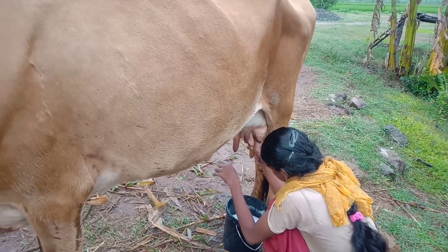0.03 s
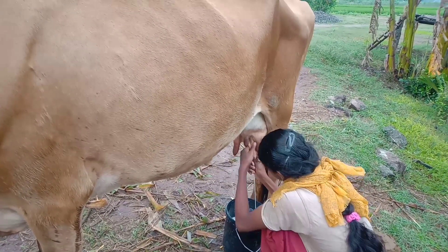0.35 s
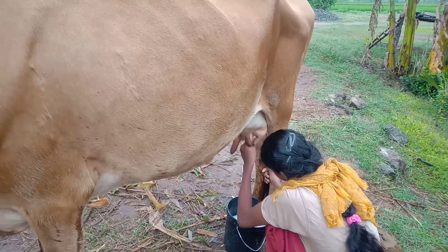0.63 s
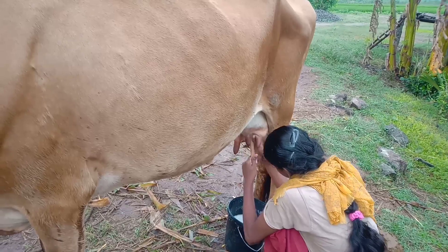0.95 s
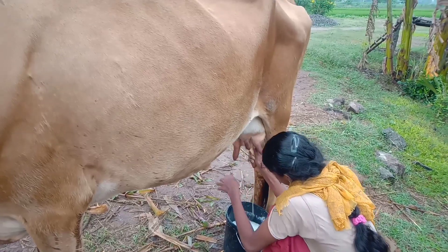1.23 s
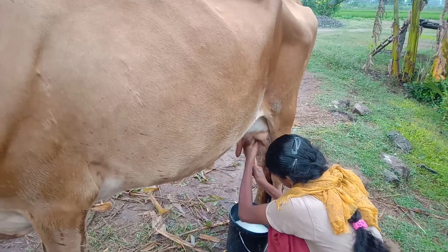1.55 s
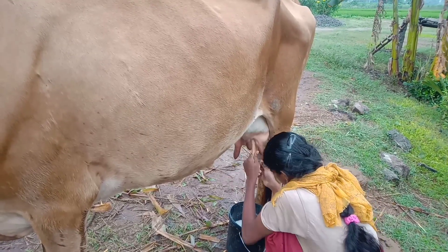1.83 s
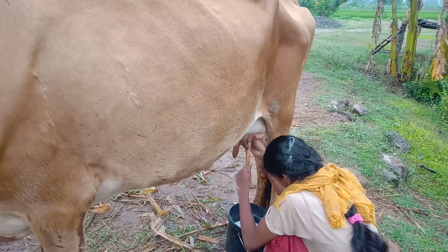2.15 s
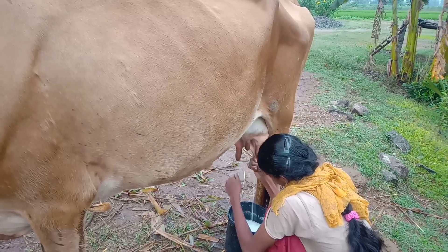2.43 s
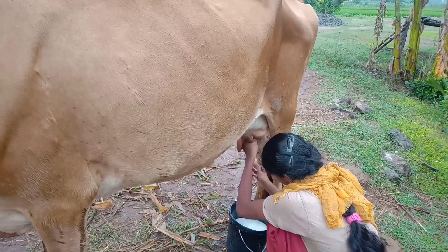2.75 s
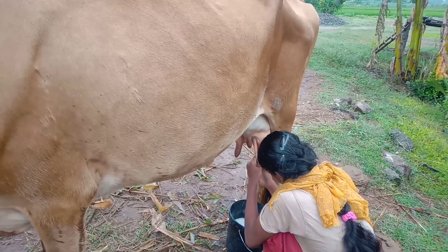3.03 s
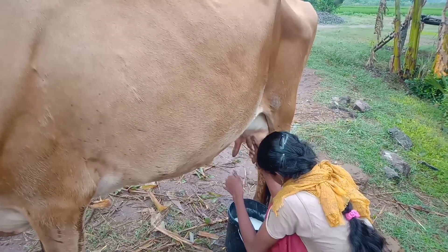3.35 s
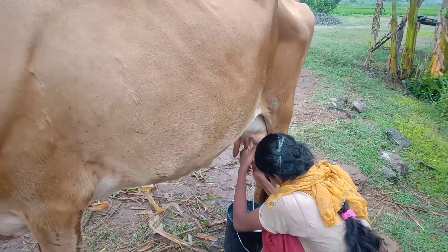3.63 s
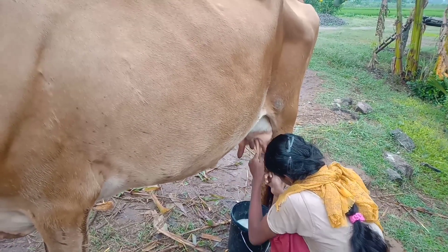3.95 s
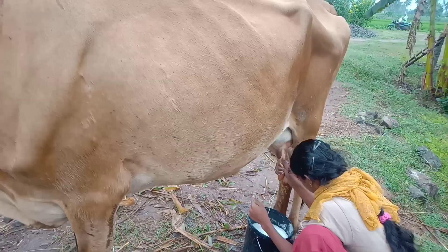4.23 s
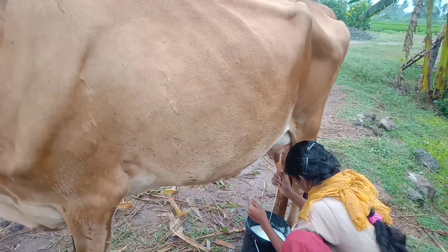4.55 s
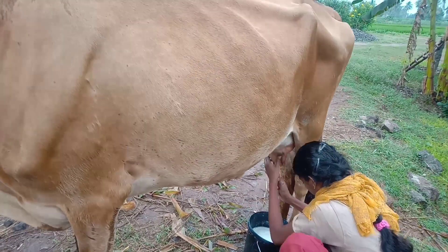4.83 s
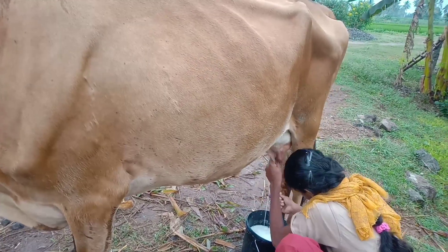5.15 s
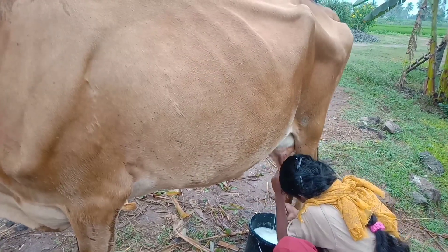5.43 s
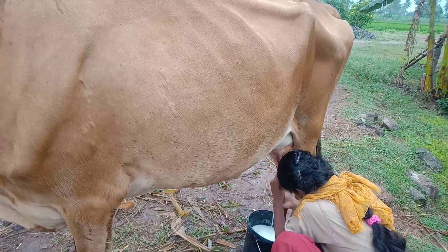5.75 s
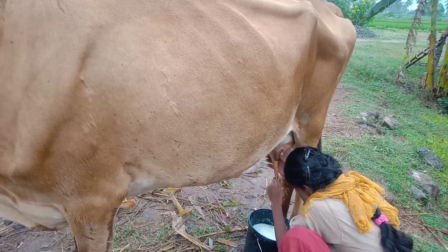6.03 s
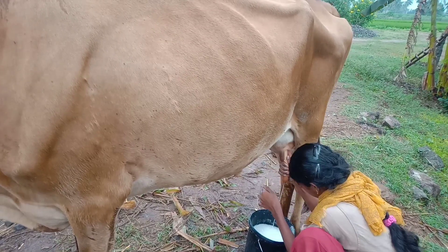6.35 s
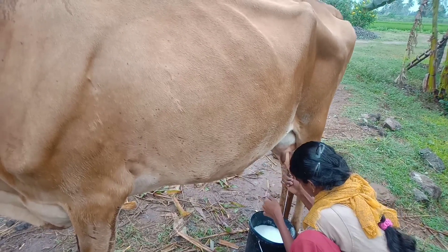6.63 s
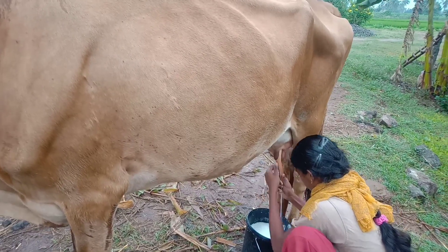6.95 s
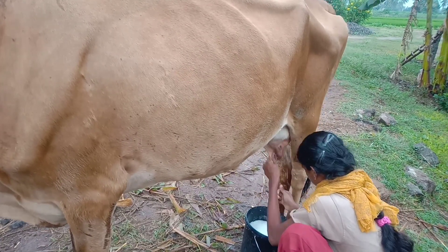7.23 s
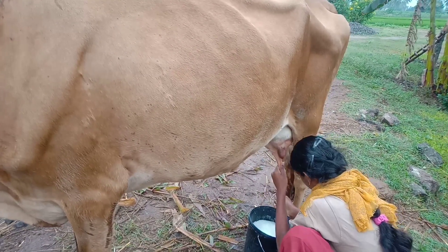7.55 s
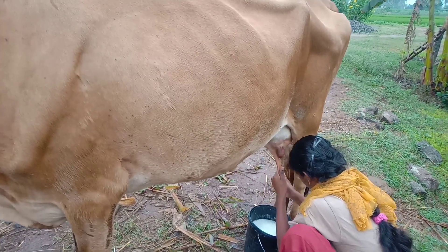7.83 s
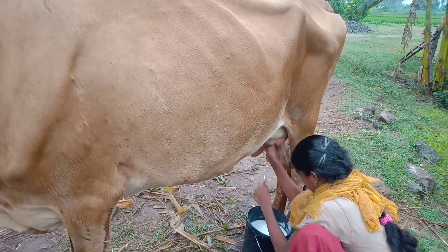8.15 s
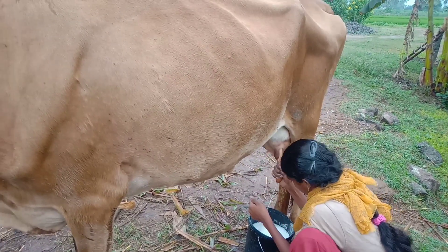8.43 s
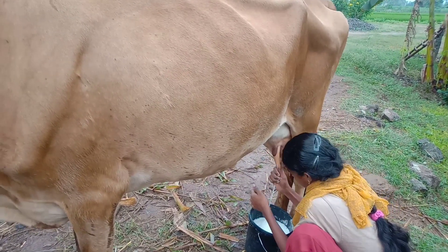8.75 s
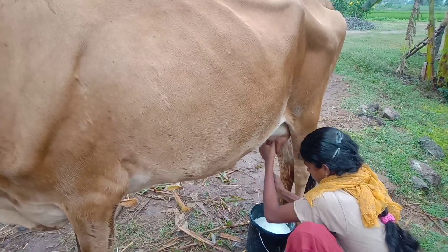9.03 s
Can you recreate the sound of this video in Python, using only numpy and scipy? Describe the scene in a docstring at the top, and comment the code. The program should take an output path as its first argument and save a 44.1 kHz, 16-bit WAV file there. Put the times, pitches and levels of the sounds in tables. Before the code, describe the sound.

A cow is milked by hand outdoors. Jets of milk squirt about twice a second into a partly filled bucket, splattering, fizzing in the froth and bubbling with a hollow ring. A small bird peeps now and then, and in the second half chatters in quick falling chirps. Straw snaps lightly, cloth rustles, and the hand-held microphone bumps softly midway. A steady high hiss lies underneath.

```python
"""Milking a cow by hand

Outdoors, jets of milk bore into the froth in a bucket. They splatter, make the froth fizz, and drag
air under the surface, which bubbles up and rings the bucket's hollow. A small bird peeps, then chatters
in falling chirps. Straw snaps, cloth rustles, and the hand-held microphone bumps and creaks softly.
A steady high hiss lies under everything, and left and right sound almost the same."""
import sys
import numpy as np
from scipy import signal
from scipy.fft import rfft, irfft, next_fast_len
from scipy.io import wavfile
from scipy.ndimage import uniform_filter1d, map_coordinates

SR = 44100
rng = np.random.default_rng(int(sys.argv[2]) if len(sys.argv) > 2 else 0)


def waveform_to_disk(signal):
    """Save audio, clipped to [-1, 1], as 16-bit WAV at the path in sys.argv[1]."""
    frames = np.transpose(np.atleast_2d(signal))
    scaled = np.clip(frames, -1, 1) * 32767
    samples = np.round(scaled).astype(np.int16)
    wavfile.write(sys.argv[1], SR, samples)


N = 410130

# Tone colours, which say how strong each frequency is: (frequency [Hz], gain [dB])
AIR_TONE = [(25, -32.5), (60, -15.5), (100, -8), (170, -13.5), (250, -19.5), (350, -19.5), (520, -22),
            (750, -25), (1050, -26), (1230, -10), (1500, -7), (3000, -3), (3900, -13), (4600, -11),
            (6000, -43)]  # the open air
HISS_TONE = [(3800, -49.5), (4600, -8), (5100, 2), (6000, -1), (6700, 1), (7500, 6.5), (8150, 3.5),
             (8800, -9.5), (10100, -20.5), (12500, -25.5), (15200, -36.5)]  # the steady high hiss
HOUSING_TONE = [(25, -23.5), (60, -10), (90, 0.5), (115, 4), (160, -2), (260, -10.5), (500, -58.5)]  # the microphone's housing
SPLATTER_TONE = [(450, -23.5), (620, -12), (740, -10), (850, -1), (950, -2), (1060, 1.5), (1170, 2),
                 (1280, 1), (1480, -9), (2200, -34.5)]  # the higher ringing of the air in the bucket
HOLLOW_TONE = [(70, -42), (150, -8), (230, -8.5), (310, -0.5), (370, 4.5), (410, 4.5), (455, 1.5),
               (520, -10.5), (620, -11.5), (800, -41)]  # its lowest ringing
FIZZ_TONE = [(850, -53.5), (1130, -18), (1360, -5.5), (2000, 0), (3100, 1), (4300, -4), (5500, 3.5),
             (7000, 2), (8200, -10.5), (8900, -18), (11000, -21.5), (15000, -35.5)]  # bursting froth
VERY_HIGH_TONE = [(5000, -31.5), (8000, -5), (10200, 4), (12500, -3.5), (15300, -13)]  # fine spray, and rustling cloth too
RASP_TONE = [(500, -37.5), (900, -9), (2000, -25), (3200, 4.5), (4500, -5), (5900, 8.5), (7000, 3.5),
             (8500, -11), (13000, -28)]  # the bird's rasp
THROAT_TONE = [(1300, -26), (1750, -20), (2150, -10), (2700, -7), (3400, 0.5), (3850, -6.5), (4300, 0),
               (4800, -3), (5350, 7.5), (6300, -2), (7000, 4.5), (8200, -23), (10000, -30)]  # the bird's throat

# Levels below compare the rows of a table; the functions may turn a whole layer up or down.
# Rumble of the hand on the microphone: (time [s], level [dB])
GRIP_RUMBLE = [(0.0, -89), (1.47, -91), (2.7, -84), (3.52, -90), (4.17, -87), (4.5, -68.5), (6.24, -74),
               (6.55, -79), (7.8, -84), (8.3, -76), (9.3, -81.5)]
# Bumps on the microphone: (time [s], peak level [dB])
GRIP_BUMPS = [(4.231, -54), (4.309, -63), (4.36, -50), (4.649, -61), (4.696, -51), (4.728, -51),
              (4.848, -54), (4.939, -58.5), (5.145, -50.5), (5.178, -52), (5.284, -51.5), (5.349, -54),
              (5.387, -50), (5.94, -51), (8.191, -61.5)]
# Jets plunging into the milk:
# (time [s], length [s], time to the hardest squeeze [s], bubbling level [dB], splatter level [dB])
MILK_JETS = [(0.157, 0.21, 0.037, -61.5, -60.5), (0.356, 0.13, 0.085, -59, -64.5),
             (0.673, 0.19, 0.026, -60, -55.5), (0.843, 0.16, 0.046, -62, -59.5),
             (1, 0.078, 0.057, -64.5, -73), (1.295, 0.094, 0.037, -68.5, -63.5),
             (1.44, 0.058, 0.013, -65, -66.5), (1.516, 0.086, 0.031, -70, -64),
             (1.742, 0.047, 0.028, -77.5, -61), (1.785, 0.1, 0.04, -61.5, -62.5),
             (1.9, 0.2, 0.06, -64, -62.5), (2.044, 0.13, 0.072, -67.5, -63),
             (2.209, 0.047, 0.016, -99, -60.5), (2.368, 0.22, 0.15, -62, -64), (2.528, .19, 0.09, -60, -58),
             (2.922, 0.032, 0.014, -60, -57.5), (2.977, 0.21, 0.037, -59, -56.5),
             (3.423, 0.043, 0.021, -61.5, -62), (3.479, 0.22, 0.13, -60, -59),
             (3.721, 0.038, 0.02, -66, -66), (3.963, 0.2, 0.14, -61.5, -60),
             (4.196, 0.073, 0.046, -62, -59.5), (4.279, 0.4, 0.098, -76.5, -61.5),
             (4.539, 0.44, 0.31, -83, -62), (5.13, 0.45, 0.14, -77, -61), (5.581, 0.14, 0.044, -70, -60.5),
             (5.723, 0.18, 0.075, -76.5, -64), (5.918, 0.073, 0.019, -61, -60.5),
             (6.017, 0.068, 0.021, -69, -64.5), (6.325, 0.17, 0.06, -67, -64),
             (6.51, 0.098, 0.04, -67.5, -65), (6.656, 0.12, 0.036, -76.5, -70),
             (6.809, 0.29, 0.18, -79, -65), (7.28, 0.11, 0.03, -66, -59.5),
             (7.389, 0.33, 0.072, -77.5, -59.5), (7.69, 0.99, 0.17, -82.5, -67), (8.34, .16, .1, -64, -63),
             (8.543, 0.123, 0.06, -68, -65.5), (8.664, 0.22, 0.13, -66, -65.5),
             (8.887, 0.17, 0.14, -73.5, -62.5), (9.249, 0.097, 0.044, -74, -63.5)]
# Jets raking the froth: (time [s], length [s], fizz level [dB], spray level [dB])
FROTH_JETS = [(0.094, 0.06, -54, -72), (0.17, 0.17, -56.5, -65), (0.512, 0.17, -60, -72.5),
              (0.629, 0.099, -54, -67), (0.698, 0.11, -50, -63), (0.808, 0.064, -55.5, -62),
              (0.89, 0.28, -62.5, -70), (1.183, 0.17, -52.5, -68.5), (1.56, 0.27, -55, -66.5),
              (1.829, 0.19, -62, -62), (2.013, 0.29, -55.5, -63.5), (2.359, 0.17, -58.5, -60.5),
              (2.538, 0.21, -51, -60.5), (2.74, 0.084, -57, -65.5), (2.909, 0.088, -56.5, -65.5),
              (3.006, 0.25, -52.5, -64.5), (3.274, 0.17, -62, -73), (3.466, 0.16, -52, -58),
              (3.631, 0.11, -55.5, -63), (3.861, 0.16, -58, -64.5), (3.991, 0.25, -52.5, -61.5),
              (4.3, 0.2, -61, -74), (4.438, 0.683, -61, -66), (5.119, 0.45, -61.5, -72),
              (5.589, 0.46, -64, -77), (5.924, 0.07, -54.5, -61), (6.021, 0.79, -58, -70),
              (6.852, 0.4, -56.5, -66), (7.294, 0.24, -51.5, -59.5), (7.519, 0.86, -55.5, -63),
              (8.344, 0.57, -55.5, -65), (8.88, 0.42, -58.5, -67.5)]
# How each part of a jet's sound swells and fades:
# (head start [s], rise time [s], drop away from the crest [dB per jet length], time to fade 60 dB [s])
SPLATTER_SWELL = (0.022, 0.034, 9, 0.19)
FIZZ_SWELL = (0.029, 0.043, 4.9, 0.18)
SPRAY_SWELL = (0.0056, 0.01, 5.7, 0.17)
BUBBLING_SWELL = (0.0011, 0.013, 7.9, 0.07)
# The hollow's note as the jet digs a pit in the milk: (time [s], pitch [Hz])
PIT_NOTE = [(.17, 335.4), (.42, 364.8), (.49, 302), (.7, 338.6), (.82, 386), (.93, 418), (1.0, 401),
            (1.07, 291.5), (1.32, 371), (1.5, 352), (1.8, 379), (1.92, 409), (2.0, 366.4), (2.08, 265.6),
            (2.16, 368), (2.38, 371.8), (2.55, 399.5), (2.7, 362.6), (2.95, 389.2), (3.15, 432),
            (3.45, 371.3), (3.6, 412), (3.73, 355.7), (4.0, 428), (4.09, 431.6), (4.15, 341), (4.22, 429.4),
            (5.65, 409.6), (5.95, 371), (6.05, 481), (6.36, 350.3), (6.55, 377.6), (8.4, 420.5),
            (8.47, 388), (8.62, 430.7), (8.72, 420), (8.82, 332.6), (8.95, 498)]
# Big drops in the milk: (time [s], level [dB], pitch [Hz], ring time [cycles])
BIG_DROPS = [(0.172, -39, 1300, 4.3), (0.394, -50, 323, 3.5), (0.465, -50, 254, 4.2),
             (0.694, -27, 863, 3.5), (0.846, -40, 1820, 18), (1.049, -52, 234, 3.6),
             (1.198, -37.5, 1370, 15), (1.825, -46.5, 370, 3.9), (2.03, -41.5, 262, 4.2),
             (2.099, -48, 231.5, 5.4), (2.634, -34, 950, 4.6), (2.637, -43, 420, 4.7),
             (2.934, -37.5, 850, 5.5), (3.532, -36, 1330, 9), (5.931, -41.5, 1002, 6), (5.944, -57, 190, 4),
             (7.281, -34, 1113, 6.7), (3.64, -50.5, 261.6, 4.6), (8.195, -58, 340, 3.7),
             (8.463, -49.5, 854, 8.2), (8.466, -49, 321, 4.2)]
# Clumps of bubbles: (time [s], length [s], pitch [Hz], width [octaves], level [dB])
BUBBLE_CLUMPS = [(0.253, 0.068, 990, 0.3, -60), (0.31, 0.04, 660, 0.28, -68),
                 (0.682, 0.035, 721, 0.95, -55), (0.719, .05, 800, 0.65, -59),
                 (1.303, 0.051, 780, 0.2, -64), (1.532, 0.033, 965, 0.27, -60.5),
                 (2.561, 0.022, 898, .4, -55), (2.629, 0.019, 1020, 0.66, -51.5),
                 (2.932, 0.032, 608, 1, -65), (2.986, 0.089, 722, 0.31, -66),
                 (3.186, 0.036, 605, 0.92, -69), (3.487, 0.1, 1226, 0.33, -56.5),
                 (5.208, 0.047, 858, 0.22, -64), (5.931, 0.029, 700, 0.98, -65),
                 (6.35, 0.099, 846, .2, -70), (6.874, 0.052, 918, 0.2, -66.5),
                 (7.437, 0.041, 754, 0.37, -63), (7.504, 0.065, 720, 0.28, -63),
                 (8.356, 0.041, 862, 0.22, -63), (8.438, 0.052, 860, 0.19, -59.5),
                 (8.521, 0.053, 803, 0.26, -62.5), (8.658, 0.042, 861, 0.32, -62),
                 (8.703, 0.056, 772, 0.26, -63.5), (8.763, 0.049, 906, 0.2, -62),
                 (8.994, 0.073, 854, 0.37, -69.5)]
# Gurgles of trapped air: (time [s], length [s], start pitch [Hz], end pitch [Hz], level [dB])
AIR_POCKETS = [(.83, 0.11, 401.5, 441, -62.5), (2.052, 0.084, 246, 233.5, -65),
               (5.94, 0.064, 670, 633, -62.5), (5.815, 0.044, 350, 376, -69.5),
               (6.04, 0.034, 470, 490, -68.5), (7.322, 0.14, 1260, 1250, -59), (8.92, 0.15, 517, 509, -69)]
# Short bird notes: (time [s], length [s], start pitch [Hz], end pitch [Hz], level [dB])
BIRD_PEEPS = [(1.007, 0.056, 4730, 5500, -55), (2.069, 0.024, 5510, 5500, -46),
              (4.29, 0.0333, 6940, 7090, -51), (5.324, 0.033, 7090, 6860, -48),
              (5.421, 0.054, 3350, 3910, -54), (5.419, 0.067, 6920, 6730, -51),
              (5.534, .025, 7270, 7000, -48), (5.556, 0.019, 5900, 5650, -51.5),
              (5.64, 0.045, 6900, 6040, -56), (5.737, 0.052, 3295, 3230, -63),
              (5.854, 0.032, 3135, 2950, -47), (5.957, 0.022, 3440, 3340, -56),
              (7.198, 0.029, 3055, 2754, -56), (7.2, 0.025, 6200, 5480, -50),
              (7.315, 0.04, 3240, 2970, -46.5), (7.319, 0.03, 6350, 6030, -40),
              (7.374, 0.091, 1980, 1860, -55), (7.585, 0.016, 2940, 4100, -54.5),
              (7.725, 0.016, 2930, 4230, -50), (7.723, 0.02, 4480, 6480, -44.5),
              (8.826, 0.024, 5580, 5500, -49.5)]
# Straw snapping underfoot: (time [s], level [dB], pitch [Hz])
STRAW_SNAPS = [(2.8409, -35.5, 5540), (3.6693, -35.5, 5500), (4.232, -38, 7000), (5.8876, -37, 1910),
               (8.253, -37, 5500), (8.301, -40, 5940)]
# Light, hollow knocks of the creaking grip: (time [s], level [dB], pitch [Hz])
HOLLOW_KNOCKS = [(4.312, -56, 646), (4.385, -55, 617), (4.456, -54.5, 641), (4.52, -50, 597),
                 (4.584, -54, 583), (4.728, -59, 597)]
# Falling chirps: (time of the crest [s], length [s], top pitch [Hz], fall [octaves],
# bend [1 = straight, more = a late drop], level [dB], upper overtones [dB], rasp [dB], hoarseness [0-1])
BIRD_CHIRPS = [(5.552, .03, 2384, 0.35, 1.4, -63.5, -10.5, 8.5, .9),
               (5.629, 0.044, 1867, 0.29, 0.81, -54.5, -11, -11, 0.83),
               (5.765, 0.034, 2340, 0.17, 1.4, -61, -5, 6, 0.8),
               (5.871, 0.033, 2290, 0.32, 3, -51.5, -14, -3, .15),
               (5.982, .04, 2315, 0.27, 1.8, -53, -2, -11, .45),
               (6.09, 0.033, 2250, 0.17, 1.6, -59, -4.5, 5, .9),
               (6.203, 0.047, 2227, 0.1, 2, -59, -12.5, -1, 0.77),
               (6.327, 0.036, 2260, .12, 1.06, -56.5, -7, 1, 0.92),
               (6.461, 0.032, 2165, 0.17, 1.2, -54.5, -7.5, 1.5, .9),
               (6.581, 0.047, 2165, 0.13, 1.1, -57, -9, 4, 0.46),
               (6.718, .028, 2215, 0.32, 1.33, -55, -1, 3, 0.54),
               (6.834, .022, 2228, 0.088, 1.25, -55.5, -8, 2, .6),
               (6.978, 0.023, 2150, 0.22, 1.3, -56, -2, 2, 0.77),
               (7.09, 0.028, 2147, 0.078, 1.2, -53.5, -11, 2, 0.32),
               (7.221, 0.034, 2174, 0.23, 1.64, -52.5, -1, -2, 0.32),
               (7.342, 0.045, 2154, 0.62, 2.6, -44.5, -8, -9, .08),
               (7.471, 0.042, 2310, 0.37, 0.87, -48, -3.5, -12, .1),
               (7.605, 0.038, 2150, 0.35, 1.1, -52, 0.5, -9, .12),
               (7.74, 0.04, 2266, 0.48, 1.2, -48, -6, -6, 0.1),
               (7.876, 0.042, 2290, 0.41, 1.5, -52.5, -9.5, -7, 0.53),
               (8.038, .03, 2260, .2, 1.2, -58.5, -9.5, -1.5, 0.93),
               (8.192, 0.033, 2263, 0.18, 1.2, -57.5, -10, 2, .9),
               (8.645, 0.05, 2406, 0.26, 2.2, -54.5, -12, -4, 0.68),
               (8.785, 0.047, 2360, 0.21, 2.2, -53, -12, -2, .7)]
# Harsh bird calls: (time [s], length [s], level [dB])
BIRD_RASPS = [(5.916, 0.082, -46.5), (7.372, 0.14, -55), (7.436, 0.039, -48)]
# Ticks of rustling cloth: (time [s], level [dB])
RUSTLE_TICKS = [(6.4697, -50.5), (7.0944, -48), (7.6644, -49), (8.1943, -43.5), (8.2871, -47),
                (8.7244, -42.5), (9.2534, -45)]


def amp(db):
    """Turn decibels into a number to multiply by."""
    return 10 ** (np.asarray(db) / 20)


def unit(x):
    """Scale x to an average strength (rms) of 1."""
    return x / np.sqrt(np.mean(x ** 2) + 1e-20)


def curve(rows):
    """Join (time, value) points with straight lines, one value per sample."""
    return np.interp(np.arange(N) / SR, *np.transpose(rows))


def wobble(rate):
    """A smooth random curve through `rate` new values a second."""
    return map_coordinates(rng.standard_normal(int(N * rate / SR) + 4), [np.arange(N) * rate / SR])


def colour(x, points):
    """Filter x with a tone colour of (Hz, dB) points; the result has strength 1."""
    size = 2 * next_fast_len(len(x) // 2 + 4096)
    hz, db = np.transpose(points)
    gain = amp(np.interp(np.log(np.fft.rfftfreq(size, 1 / SR) + 1), np.log(hz), db))
    cepstrum = irfft(np.log(gain))
    cepstrum[1:size // 2] *= 2  # folded so the filter rings only after a sound, never before
    cepstrum[size // 2 + 1:] = 0
    return unit(irfft(rfft(x, size) * np.exp(rfft(cepstrum)))[:len(x)])


def noise(points):
    """Noise with the given tone colour."""
    return colour(rng.standard_normal(N), points)


def add(track, s, sound):
    """Mix a sound into the track at s seconds."""
    i = max(round(s * SR), 0)
    track[i:i + len(sound)] += sound[:max(N - i, 0)]


def arch(length):
    """A smooth swell and fade."""
    return np.sin(np.linspace(0, np.pi, int(length * SR)))


def retuned(x, ratio):
    """Play x faster or slower from moment to moment, which shifts its pitch."""
    return map_coordinates(x, [np.cumsum(ratio)], mode="mirror")


def patchy(x, depth_db):
    """Make random patches of x, about 700 Hz by 40 ms, louder or softer."""
    spectrum = signal.stft(x, nperseg=512)[2]
    patches = uniform_filter1d(rng.standard_normal(spectrum.shape), size=8, axis=0)
    patches = uniform_filter1d(patches, size=7, axis=1)
    return unit(signal.istft(spectrum * amp(depth_db * unit(patches)), nperseg=512)[1][:N])


def whistle(s, length, start_hz, end_hz, detune, strength):
    """One gliding note, bent by the detune and strength curves from time s on."""
    shape = arch(length)
    here = np.minimum(int(s * SR) + np.arange(len(shape)), N - 1)
    pitch = np.linspace(start_hz, end_hz, len(shape)) * detune[here]
    return np.sqrt(2) * shape * strength[here] * np.sin(2 * np.pi * np.cumsum(pitch) / SR)


def bubbles(per_s, low_hz, high_hz, cycles, spread_db, samples):
    """A cloud of bubbles, each ringing briefly and rising in pitch as it nears the surface."""
    when, pitch, strength, sign = rng.random((int(per_s * N / SR), 4)).T[:, :, None]
    turns = low_hz * (high_hz / low_hz) ** pitch * np.arange(samples) / SR
    ring = np.sin(2 * np.pi * turns * (1 + 0.03 * turns / cycles)) * np.exp(-turns / cycles)
    pops = np.sign(sign - .5) * amp(spread_db * strength ** 2) * ring
    places = (when * N).astype(int) + np.arange(samples)
    return unit(np.bincount(places.ravel(), pops.ravel(), N)[:N])


def squeeze(swell, jets):
    """Loudness over time: each jet starts, swells to its crest and dies away."""
    lead_s, rise_s, sag_db, fade_s = swell
    power, t = np.zeros(N), np.arange(SR) / SR - lead_s
    for s, length, crest_s, db in jets:
        onset = np.clip((t + lead_s) / rise_s, 0, 1)
        fade_db = sag_db * np.abs(t - crest_s) / length + 60 * np.maximum(t - length, 0) / fade_s
        add(power, s - lead_s, (onset * amp(db - fade_db)) ** 2)
    return np.sqrt(power)


def background(hiss_start_db=-54, rise_db_per_s=0.26):
    """Open air and a steady high hiss that slowly grows."""
    air = amp(-62.5 + 0.42 * wobble(3.6)) * noise(AIR_TONE)
    hiss_db = hiss_start_db + rise_db_per_s * np.arange(N) / SR
    return air + amp(hiss_db + 0.5 * wobble(60)) * noise(HISS_TONE)


def handling(fade_s=0.16, bump_gain_db=-3, rumble_gain_db=-2):
    """The grip shifts on the microphone: dull bumps on a faint rumble."""
    out, t = np.zeros(N), np.arange(SR // 5) / SR
    for s, db in GRIP_BUMPS:
        bump = colour(rng.standard_normal(len(t)) * amp(-60 * t / fade_s), HOUSING_TONE)
        add(out, s - .008, amp(db + bump_gain_db) * bump / np.abs(bump).max())
    return out + amp(curve(GRIP_RUMBLE) + rumble_gain_db) * noise(HOUSING_TONE)


def splatter(beads, octaves_per_db=0.03, wander_octaves=0.05):
    """The jet splatters on the milk; a harder jet traps larger, lower bubbles."""
    jets = [(s, length, crest, db) for s, length, crest, _, db in MILK_JETS]
    strength = np.hypot(squeeze(SPLATTER_SWELL, jets), amp(-74.5))  # never quite silent
    drops = bubbles(per_s=600, low_hz=616, high_hz=1505, cycles=6.3, spread_db=5, samples=1200)
    plunge_db = 20 * np.log10(strength) + 63  # above zero, the pitch drops
    octaves = wander_octaves * wobble(14) - octaves_per_db * plunge_db
    drops = retuned(colour(drops, SPLATTER_TONE), 2 ** octaves)
    aim = wobble(22)  # the jet wanders over the froth
    return strength * amp(-2.5 + beads + 0.54 * aim) * drops


def fizz(beads, tinkle_db=-12.5):
    """Froth bursts under the jet, and softly between jets; some small bubbles ring on."""
    jets = [(s, length, length / 2, db) for s, length, db, _ in FROTH_JETS]
    strength = np.hypot(squeeze(FIZZ_SWELL, jets), amp(-64))
    pops = bubbles(per_s=2200, low_hz=1165, high_hz=11770, cycles=0.69, spread_db=7.5, samples=100)
    froth = unit(np.diff(pops, prepend=0)) + rng.standard_normal(N)
    froth = patchy(colour(froth, FIZZ_TONE), depth_db=1.5)  # the colour shifts as the jet wanders
    tinkle = bubbles(per_s=150, low_hz=1298.6, high_hz=6070, cycles=22, spread_db=10.5, samples=1800)
    return strength * amp(0.5 + 1.15 * beads) * (froth + amp(tinkle_db) * tinkle)


def spray(beads):
    """Fine spray from the froth makes a high, flickering hiss that swells with the jets."""
    jets = [(s, length, length / 2, db) for s, length, _, db in FROTH_JETS]
    strength = np.hypot(squeeze(SPRAY_SWELL, jets), amp(-67))
    return strength * amp(-3.5 + 0.4 * beads + 2 * wobble(140)) * noise(VERY_HIGH_TONE)


def bubbling(rest_hz=381.5, waver_octaves=0.0499, note_db=-6, glug_db=2, glugs_per_s=55, gain_db=-2):
    """Air dragged under the surface comes up in glugs and rings the shifting hollow."""
    jets = [(s, length, crest, db) for s, length, crest, db, _ in MILK_JETS]
    pitch = curve(PIT_NOTE) * 2 ** (waver_octaves * wobble(45))  # the pit never holds still
    deep = bubbles(per_s=300, low_hz=166.6, high_hz=646, cycles=1.35, spread_db=7.5, samples=700)
    hollow = retuned(colour(deep, HOLLOW_TONE), pitch / rest_hz)
    note = np.sqrt(2) * np.sin(2 * np.pi * np.cumsum(pitch) / SR)
    glugs = unit(amp(glug_db * wobble(glugs_per_s)))
    return squeeze(BUBBLING_SWELL, jets) * amp(gain_db) * glugs * (hollow + amp(note_db) * note)


def plops(rise=0.0094, gain_db=-8.5):
    """Each big drop traps one bubble, which rings with a slightly rising pitch."""
    out, t = np.zeros(N), np.arange(SR // 10) / SR
    for s, db, hz, cycles in BIG_DROPS:
        turns = hz * t
        shape = np.exp(-turns / cycles) * (1 - np.exp(-4 * turns / cycles))
        ring = np.sin(2 * np.pi * turns * (1 + rise * turns / cycles))
        add(out, s, amp(db + gain_db) * shape * ring)
    return out


def sloshes():
    """The jet throws up clumps: brief, rough bursts of bubbles of about one size."""
    out = np.zeros(N)
    cloud = bubbles(per_s=1200, low_hz=295, high_hz=1770, cycles=0.95, spread_db=8.5, samples=400)
    for s, length, hz, width, db in BUBBLE_CLUMPS:
        shape = arch(length)
        band = [(hz * 2 ** (k * width), gain) for k, gain in zip(range(-2, 3), (-40, -8, 0, -8, -40))]
        clump = cloud[int(s * SR):][:len(shape)] * shape
        burst = colour(np.pad(clump, (0, SR // 50)), band)
        add(out, s, amp(db) * burst * np.sqrt(np.sum(shape ** 2) / len(burst)))
    return out


def gurgles(waver=0.025, flutter_db=3):
    """Large air pockets ring at an unsteady, gliding pitch."""
    out = np.zeros(N)
    unsteady = 1 + waver * wobble(90)
    strength = unit(amp(flutter_db * wobble(60)))
    for s, length, start_hz, end_hz, db in AIR_POCKETS:
        add(out, s, amp(db) * whistle(s, length, start_hz, end_hz, unsteady, strength))
    return out


def peeps(gain_db=-1):
    """The bird whistles short, ragged notes."""
    out = np.zeros(N)
    strength = unit(amp(2.6 * wobble(160)))
    ragged = 1 + .026 * wobble(1100)
    for s, length, start_hz, end_hz, db in BIRD_PEEPS:
        add(out, s, amp(db + gain_db) * whistle(s, length, start_hz, end_hz, ragged, strength))
    return out


def yard(x, fade_s=0.84, echo_s=0.012, echo_db=-10, tail_db=-9):
    """A nearby surface throws back one echo; trees and ground scatter a short tail."""
    t = np.arange(SR // 3) / SR
    tail = rng.standard_normal(len(t)) * amp(-60 * t / fade_s) * (t > .006)
    echoes = amp(tail_db) * tail / np.linalg.norm(tail)
    echoes[int(echo_s * SR)] += amp(echo_db)
    return x + signal.fftconvolve(x, echoes)[:N]


def straw(fade_s=0.027, gain_db=-6):
    """Dry stalks snap in short bursts of noise, each strongest at its own pitch."""
    out, t = np.zeros(N), np.arange(SR // 10) / SR
    for s, db, hz in STRAW_SNAPS:
        tone = [(800, -22), (1500, -5), (hz, 0), (7800, -5), (9000, -13), (15000, -21)]
        burst = colour(rng.standard_normal(len(t)), tone)
        add(out, s, amp(db + gain_db - 60 * t / fade_s) * burst)
    return out


def knocks(cycles=8, gain_db=-2):
    """The grip creaks as it sticks and slips: a quick run of light, hollow knocks."""
    out, t = np.zeros(N), np.arange(SR // 10) / SR
    for s, db, hz in HOLLOW_KNOCKS:
        turns = hz * t
        shape = np.exp(-turns / cycles) * (1 - np.exp(-turns))
        add(out, s, amp(db + gain_db) * shape * np.sin(2 * np.pi * turns))
    return out


def chirps(rise_s=.016, break_at=0.6, break_share=0.296, edge_s=0.0036, fade_db=1.1, rasp_s=0.027):
    """Each chirp flicks up with a rasp, then slides down; the bird's throat shapes its overtones."""
    out, t = np.zeros(N), np.arange(-SR // 25, SR // 14) / SR
    rasp_shape = np.exp(-((t + 0.0031) / rasp_s) ** 2)
    jitter = .04 * wobble(1300) + .014 * wobble(160)
    strength = unit(amp(1.6 * wobble(160)))
    rasp_noise = noise(RASP_TONE)
    throat_hz, throat_db = np.transpose(THROAT_TONE)
    for s, length, hz, fall, bend, db, upper_db, rasp_db, hoarse in BIRD_CHIRPS:
        here = slice(int(s * SR), int(s * SR) + len(t))
        along = np.clip(t / length, 0, 1.3)
        voice_break = (1 + np.tanh((t - break_at * length) / .001)) / 2  # a sudden step in pitch
        descent = (1 - break_share) * along ** bend + break_share * voice_break
        octaves_down = np.where(t < 0, 0.29 * (t / rise_s) ** 2, fall * descent)
        fray = hoarse * (.5 + along)  # the note frays as it falls
        pitch = hz * 2 ** -octaves_down * (1 + fray * jitter[here])
        phase = 2 * np.pi * np.cumsum(pitch) / SR
        tone = sum(amp(np.interp(k * pitch, throat_hz, throat_db) + upper_db * (k > 2))
                   * np.sin(k * phase) for k in range(1, 5))
        swell = (1 + np.tanh(t / edge_s)) * (1 + np.tanh((length - t) / edge_s)) / 4
        note = np.sqrt(2) * swell * amp(-fade_db * along) * tone
        rasp = amp(rasp_db) * rasp_shape * rasp_noise[here]
        add(out, s + t[0], amp(db) * strength[here] * (note + rasp))
    return out


def harsh_calls():
    """The bird scolds in short swells of rough noise."""
    out = np.zeros(N)
    harsh = unit(noise(RASP_TONE) * amp(2.5 * wobble(220)))
    for s, length, db in BIRD_RASPS:
        shape = arch(length)
        add(out, s, amp(db) * shape * harsh[int(s * SR):][:len(shape)])
    return out


def rustles(length_s=0.017, gain_db=-12):
    """Cloth rustles in brief, very high ticks."""
    ticks = np.zeros(N)
    for s, db in RUSTLE_TICKS:
        add(ticks, s - length_s / 3, amp(db + gain_db) * arch(length_s))
    return ticks * noise(VERY_HIGH_TONE)


def scene():
    """Milking, bird and yard, heard from almost one point."""
    beads = wobble(62)  # the jet breaks into beads, so these three sounds flutter together
    surface = splatter(beads) + fizz(beads) + spray(beads)
    milk = surface + bubbling() + plops() + sloshes() + gurgles()
    grip_and_cloth = knocks() + rustles()
    bird = yard(peeps() + chirps() + harsh_calls())
    mono = background() + handling() + milk + bird + straw() + grip_and_cloth
    # a trace of low noise sets left and right apart
    side = amp(-98.5) * noise([(30, -14), (600, 9.5), (2000, -6.5), (9000, -26)])
    return np.array([mono + side, mono - side])


def record(dry, top_hz=15480):
    """Cut away everything higher than top_hz."""
    size = next_fast_len(N + 8192)
    kept = np.fft.rfftfreq(size, 1 / SR) < top_hz
    return irfft(rfft(dry, size) * kept, size)[:, :N]


dry = scene()
out = record(dry)
waveform_to_disk(out)
```